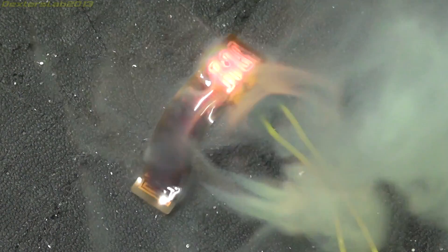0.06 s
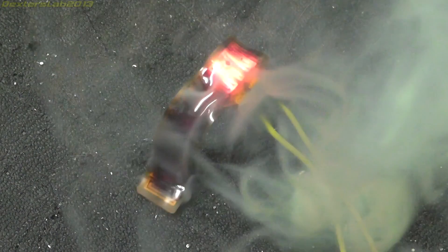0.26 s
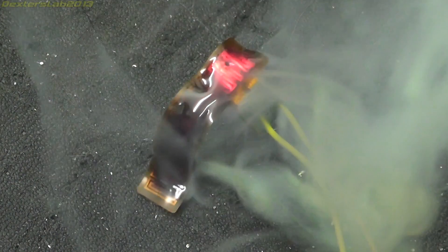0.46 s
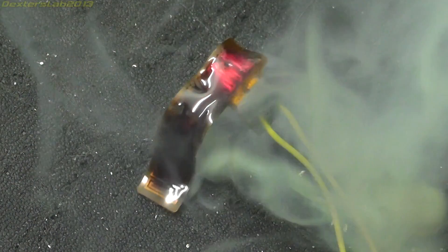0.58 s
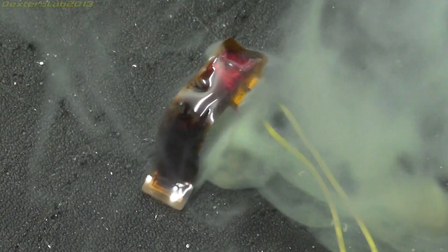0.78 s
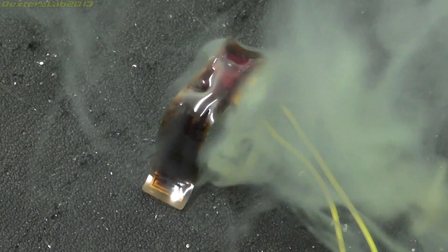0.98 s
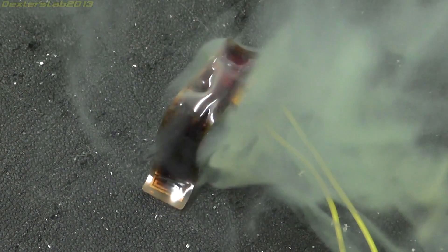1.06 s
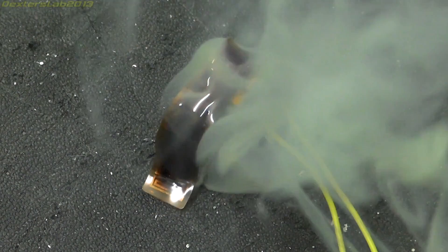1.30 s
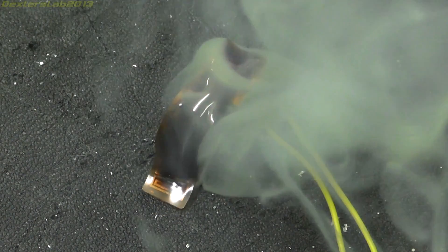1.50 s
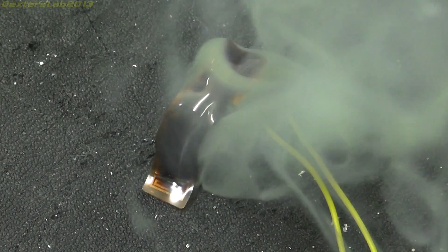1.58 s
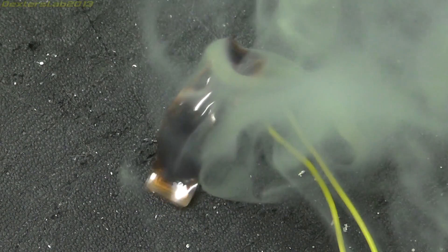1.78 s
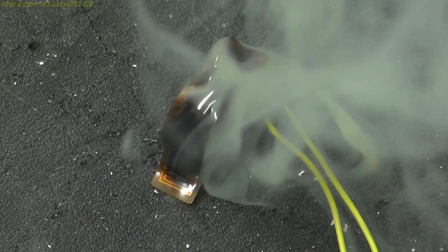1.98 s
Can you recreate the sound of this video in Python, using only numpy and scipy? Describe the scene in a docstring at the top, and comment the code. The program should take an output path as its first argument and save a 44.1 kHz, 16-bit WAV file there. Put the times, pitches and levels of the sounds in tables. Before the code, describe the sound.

Sharp electrical crackle and sizzle flares early, then fades to scattered clicks over faint low hum

```python
"""Overheating circuit strip

A strip of circuit overheats on a workbench, over a steady machine hum and low room rumble.
Blisters in its coating burst: clicks drive a bright ring, a broad snap and a low knock. Random ticks
and hiss make a fine sizzle. It flares once in a dense crackle of ticks with a soft puff of noise,
then cools and the sizzle thins out. The microphone is mono and narrow-band."""
import sys
import numpy as np
from scipy import signal
from scipy.fft import rfft, irfft
from scipy.io import wavfile

SR = 44100
rng = np.random.default_rng(int(sys.argv[2]) if len(sys.argv) > 2 else 0)


def bounce(signal):
    """Save signal as a 16-bit WAV file at the path given by the first command-line argument."""
    frames = np.transpose(np.atleast_2d(signal))
    limited = np.clip(frames, -1, 1)
    pcm = np.round(limited * 32767).astype(np.int16)
    wavfile.write(sys.argv[1], SR, pcm)


N = 90404   # length [samples]


def from_db(db):
    """Decibels to gain."""
    return 10 ** (np.asarray(db) / 20)


def rms_one(x):
    """Scale to unit rms."""
    return x / np.sqrt(np.mean(x ** 2) + 1e-20)


def white_noise():
    """Equal energy at every frequency."""
    return rng.standard_normal(N)


def gains_in_time(rows):
    """Each dB column of a curve as a gain per sample."""
    times, *columns = np.transpose(rows)
    return [from_db(np.interp(np.arange(N) / SR, times, levels)) for levels in columns]


def coloured(x, points):
    """Shape x by a smooth spectrum, straight in dB over log frequency; rms 1."""
    hz, db = np.transpose(points)
    f = np.maximum(np.fft.rfftfreq(N, 1 / SR), 1)
    shape = from_db(np.interp(np.log(f), np.log(hz), db))
    return rms_one(irfft(rfft(x) * shape, N))


def drift(rate_hz):
    """Slow random wander with spread 1: low-passed noise, one point per 100 samples."""
    lowpass = signal.butter(2, rate_hz, fs=SR / 100, output="sos")
    slow = signal.sosfilt(lowpass, rng.standard_normal(N // 100 + 502))[500:]   # drop the filter's start-up
    return np.interp(np.arange(N) / 100, np.arange(len(slow)), rms_one(slow))


def ring(x, hz, width_hz):
    """A two-pole resonance: a unit click sets it ringing at about height 1."""
    r = np.exp(-np.pi * width_hz / SR)
    w = 2 * np.pi * hz / SR
    return signal.lfilter([.5, 0, -.5], [1, -2 * r * np.cos(w), r * r], x + 1e-18)


def ticks(per_s, spread_db):
    """Tiny clicks at random moments, many weak and a few strong."""
    sizes = from_db(spread_db * np.minimum(rng.exponential(1, N), 4))
    signs = rng.choice([-1, 1], N)
    return sizes * signs * (rng.random(N) < per_s / SR)


WAVER_HZ = 8   # upper edge of the hum's wander


def tone(hz, waver):
    """A hum line that wavers in level and phase; rms 1."""
    phase = 2 * np.pi * (hz * np.arange(N) / SR + rng.random())
    in_phase = (1 + waver * drift(WAVER_HZ)) * np.sin(phase)
    quadrature = waver * drift(WAVER_HZ) * np.cos(phase)
    return rms_one(in_phase + quadrature)


# Steady lines of the machine hum: (frequency [Hz], level [dB], waver [share of the level])
HUM_LINES = [(50, -52.5, 0.41), (221.5, -58, 0.53), (316.3, -56, 0.16), (377, -74.5, 0.54),
             (443.6, -62, 0.27)]
# Level of the main hum line, the drone: (time [s], level [dB])
DRONE_LEVEL = [(0, -48.5), (.08, -56), (.28, -61), (.33, -43), (.5, -51), (.65, -53), (1.0, -51.5),
               (1.4, -48.5), (2.05, -49)]
DRONE_HZ, DRONE_WAVER = 112.1, 0.18


def hum():
    """Machine hum: steady sine lines plus a drone whose level moves."""
    drone_gain, = gains_in_time(DRONE_LEVEL)
    drone = drone_gain * tone(DRONE_HZ, DRONE_WAVER)
    return drone + sum(from_db(db) * tone(hz, waver) for hz, db, waver in HUM_LINES)


WHINE_HZ, WHINE_WIDTH_HZ, WHINE_DB = 5010, 79, -55


def whine():
    """Faint narrow hiss at the top of the band: noise through two equal resonances."""
    once = ring(white_noise(), WHINE_HZ, WHINE_WIDTH_HZ)
    twice = ring(once, WHINE_HZ, WHINE_WIDTH_HZ)
    return from_db(WHINE_DB) * rms_one(twice)


# Spectrum of the room rumble: (frequency [Hz], relative level [dB])
RUMBLE_SPECTRUM = [(10, 5.5), (30, 5), (55, -5), (80, -6.5), (130, -12.5), (180, -7), (225, -9),
                   (280, -12.5), (420, -18.5), (600, -23), (1000, -29.5), (1500, -29.5), (2100, -37),
                   (3400, -38.5), (5000, -41.5)]
RUMBLE_DB = -47.5


def rumble():
    """Room rumble: noise weighted to the lows."""
    return from_db(RUMBLE_DB) * coloured(white_noise(), RUMBLE_SPECTRUM)


# Strength of the sizzle as the strip heats and cools: (time [s], level [dB])
SIZZLE_HEAT = [(0, -41.5), (.14, -39), (.2, -36), (.25, -23), (.31, -28.5), (.38, -35.5), (.55, -41),
               (.7, -44.5), (.87, -46.5), (1.18, -55), (1.4, -55), (1.66, -56), (2.05, -58.5)]
# Spectrum of the ticks and hiss: (frequency [Hz], relative level [dB])
SIZZLE_SPECTRUM = [(300, -28), (700, -19.5), (1500, -12), (2600, -10), (3100, 0.5), (3450, 2.5),
                   (3900, -3.5), (4500, -2), (5000, -3.5)]
# Spectrum of the duller little snaps: (frequency [Hz], relative level [dB])
DULL_SPECTRUM = [(400, -22.5), (900, -0.5), (1600, -4.5), (2600, 2), (3400, -3), (5000, -11.5)]
TICKS_PER_S, DULL_PER_S, TICK_SPREAD_DB = 670, 250, 5.5
TICK_DB, DULL_DB, HISS_DB = 0, -14, -1.5   # mix within the sizzle


def sizzle():
    """The hot coating fries: fine bright ticks and fewer dull snaps over a thin hiss."""
    heat, = gains_in_time(SIZZLE_HEAT)
    bright = from_db(TICK_DB) * coloured(ticks(TICKS_PER_S, TICK_SPREAD_DB), SIZZLE_SPECTRUM)
    dull = from_db(DULL_DB) * coloured(ticks(DULL_PER_S, TICK_SPREAD_DB), DULL_SPECTRUM)
    hiss = from_db(HISS_DB) * coloured(white_noise(), SIZZLE_SPECTRUM)
    return heat * (bright + dull + hiss)


def dying_noise(clicks, t60):
    """Fresh noise after every click, with the click's energy, dying away over t60 [s]."""
    r = from_db(-120 / (t60 * SR))   # decay of power per sample
    power = signal.lfilter([1 - r], [1, -r], clicks ** 2 + 1e-18)
    return np.sqrt(power) * white_noise()


TEAR_T60_S, TEAR_DB = .005, -6     # the skin of the blister tears just after the first click
TAIL_T60_S, TAIL_DB = 0.034, -11   # scatter from the bench around the strip


def bursts(times, db):
    """A click, a brief tearing and a weak tail for each blister."""
    clicks = np.zeros(N)
    clicks[np.clip((times * SR).astype(int), 0, N - 1)] = from_db(db)
    tear = from_db(TEAR_DB) * dying_noise(clicks, TEAR_T60_S)
    tail = from_db(TAIL_DB) * dying_noise(clicks, TAIL_T60_S)
    return clicks + tear + tail


def scatter(x, t60):
    """Dense room reflections that die away: convolution with decaying noise of unit energy."""
    t = np.arange(SR // 4) / SR
    echo = rng.standard_normal(len(t)) * from_db(-60 * t / t60) * (t > .0006)   # short gap first
    return signal.fftconvolve(x, echo / np.sqrt(np.sum(echo ** 2)))[:N]


# Bursting blisters, each part's level before its trim below:
# (time [s], ring level [dB], snap level [dB], low knock level [dB])
BLISTERS = [(0.0044, -27, -34, -65), (0.043, -17.5, -24, -47.5), (0.0791, -28.5, -28.5, -49),
            (0.0842, -28, -30.5, -58), (0.0947, -23, -32.5, -48), (0.1663, -28.5, -29.5, -49),
            (0.1908, -28, -29.5, -45.5), (0.2018, -19, -31, -52), (0.2083, -14, -17.5, -34),
            (0.2221, -22, -24.5, -24), (0.2309, -13.5, -9, -28), (0.2355, -14.5, -9, -27.5),
            (0.237, -23, -15.5, -26.5), (0.2411, -22.5, -18, -28), (0.2443, -16, -3, -23),
            (0.2488, -7.5, -2, -30), (0.2526, -10.5, -4, -30), (0.2548, -17.5, -14, -29.5),
            (0.2725, -19.5, -14, -20), (0.2838, -29, -19, -23), (0.29, -18.5, -17, -29.5),
            (0.2945, -16.5, -22, -35), (0.3122, -16.5, -24.5, -29.5), (0.3141, -19, -17, -31),
            (0.339, -17.5, -12, -32), (0.3495, -16.5, -27.5, -39.5), (0.3589, -20.5, -31, -53),
            (0.3773, -27, -27, -55), (0.3878, -17, -27, -38), (0.3931, -28.5, -34, -45.5),
            (0.4384, -26, -33, -62.5), (0.4497, -22, -33.5, -50), (0.4723, -17, -30, -45),
            (0.5031, -12.5, -27.5, -43), (0.5168, -18, -26, -38), (0.5549, -30, -35.5, -51),
            (0.5822, -20, -29.5, -40), (0.5904, -17, -39.5, -51.5), (0.6201, -26, -38, -63),
            (0.659, -24.5, -33.5, -36), (0.6734, -24, -32.5, -41.5), (0.6844, -27, -34.5, -46.5),
            (0.7256, 1, -18, -42), (0.7262, -5, -9, -22), (0.7354, -19.5, -25.5, -29.5),
            (0.7892, -23.5, -34, -48), (0.8021, -4.5, -23.5, -35), (0.8638, -24, -29.5, -44.5),
            (0.998, -33, -50.5, -63.5), (1.0973, -28, -40.5, -58.5), (1.1351, -27, -49.5, -55.5),
            (1.1759, -31, -37, -62), (1.2518, -27, -36, -49.5), (1.2588, -12, -14.5, -26.5),
            (1.2891, -20, -45, -70), (1.3196, -19.5, -25, -24), (1.3222, -14, -25.5, -37.5),
            (1.433, -36.5, -47.5, -48), (1.6084, -34, -35, -41), (1.7878, -39, -65, -61),
            (1.8442, -47, -49.5, -75), (1.9588, -28, -28.5, -38), (1.9619, -20, -41, -38)]
RING_HZ, RING_WIDTH_HZ, RING_TRIM_DB = 3459, 480, 0.5
SNAP_LOW_HZ, SNAP_HIGH_HZ, SNAP_TRIM_DB = 1272, 3040, 19
KNOCK_HZ, KNOCK_WIDTH_HZ, KNOCK_TRIM_DB = 720, 360, -2
POP_TOP_HZ = 4300   # the bursts carry little above this
ROOM_T60_S, ROOM_DB = 0.33, -28


def pops():
    """Each burst drives a bright ring of a few cycles, a broad snap and a low knock; a little room follows."""
    times, ring_db, snap_db, knock_db = np.transpose(BLISTERS)
    rings = ring(bursts(times, ring_db + RING_TRIM_DB), RING_HZ, RING_WIDTH_HZ)
    snap_band = signal.butter(2, [SNAP_LOW_HZ, SNAP_HIGH_HZ], "band", fs=SR, output="sos")
    snaps = signal.sosfilt(snap_band, bursts(times, snap_db + SNAP_TRIM_DB))
    knocks = ring(bursts(times, knock_db + KNOCK_TRIM_DB), KNOCK_HZ, KNOCK_WIDTH_HZ)
    top = signal.butter(10, POP_TOP_HZ, fs=SR, output="sos")
    direct = signal.sosfilt(top, rings - snaps + knocks)   # snaps in opposite polarity
    return direct + from_db(ROOM_DB) * scatter(direct, ROOM_T60_S)


# The flare: (time [s], crackle level [dB], puff level [dB])
FLARE_LEVELS = [(0, -73, -80), (.18, -53.5, -64.5), (.228, -24, -38.5), (.247, -33, -37),
                (.255, -24.5, -28), (.263, -24.5, -35), (.277, -26.5, -31), (.29, -26, -37),
                (.302, -38, -50.5), (.345, -43.5, -52), (.43, -53.5, -85), (.7, -68.5, -82)]
# Spectrum of the crackle: (frequency [Hz], relative level [dB])
CRACKLE_SPECTRUM = [(150, -19), (500, -3.5), (1000, 0), (2000, 3), (3000, 5), (3600, -8), (4200, -5),
                    (5000, -13)]
# Spectrum of the puff: (frequency [Hz], relative level [dB])
PUFF_SPECTRUM = [(20, -5.5), (60, -2.5), (120, -4.5), (300, -4.5), (600, -9), (1500, -28.5), (4000, -53.5)]
CRACKLE_TICKS_PER_S, CRACKLE_SPREAD_DB = 1300, 3


def flare():
    """The strip flashes: a dense crackle of ticks and a low puff of gas made of noise."""
    crackle_gain, puff_gain = gains_in_time(FLARE_LEVELS)
    crackle = coloured(ticks(CRACKLE_TICKS_PER_S, CRACKLE_SPREAD_DB), CRACKLE_SPECTRUM)
    puff = coloured(white_noise(), PUFF_SPECTRUM)
    return crackle_gain * crackle + puff_gain * puff


def scene():
    """Everything reaches one microphone, alike in both channels."""
    strip = pops() + sizzle() + flare()
    background = hum() + whine() + rumble()
    return np.tile(strip + background, (2, 1))


MIC_EDGE_HZ, MIC_TOP = 3877, 0.91   # treble roll-off; clipping level [full scale = 1]
BAND_LIMIT_HZ, CUTOFF_HZ = 5100, 15850   # steep band end; stopband edge after clipping


def record(dry):
    """The microphone rolls off the treble, the band ends steeply and the loudest peaks clip."""
    mic = signal.sosfilt(signal.butter(9, MIC_EDGE_HZ, fs=SR, output="sos"), dry)
    narrow = signal.sosfilt(signal.ellip(8, .5, 60, BAND_LIMIT_HZ, fs=SR, output="sos"), mic)
    clipped = np.clip(narrow, -MIC_TOP, MIC_TOP)
    return signal.sosfilt(signal.cheby2(12, 70, CUTOFF_HZ, fs=SR, output="sos"), clipped)


dry = scene()
out = record(dry)
bounce(out)
```